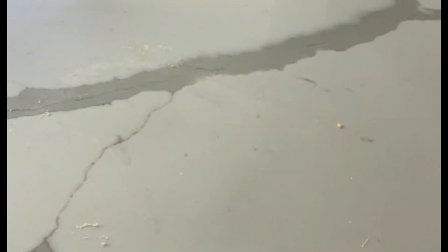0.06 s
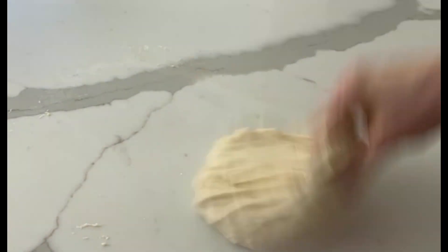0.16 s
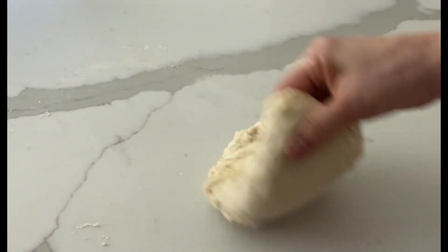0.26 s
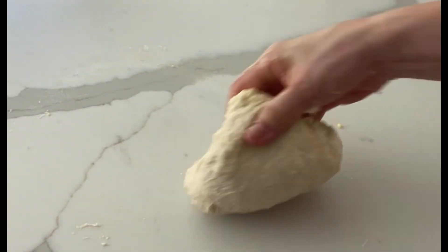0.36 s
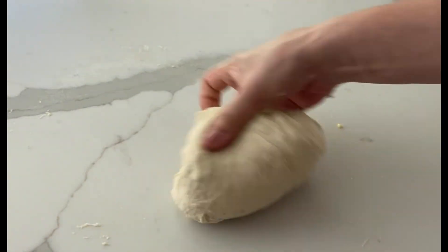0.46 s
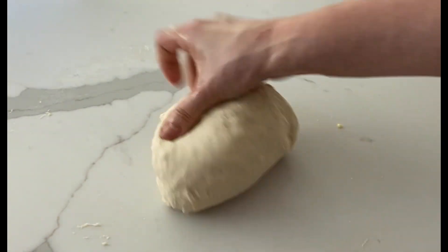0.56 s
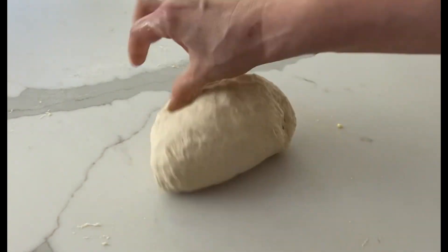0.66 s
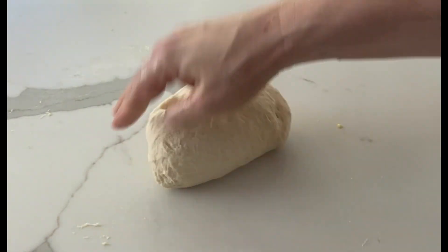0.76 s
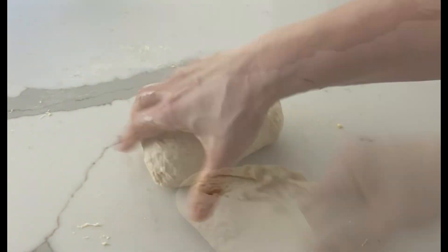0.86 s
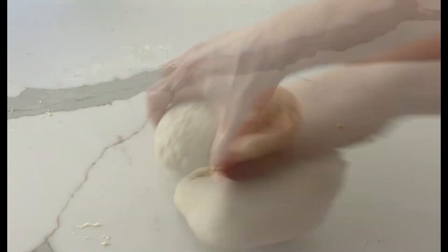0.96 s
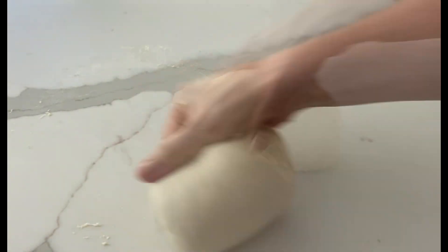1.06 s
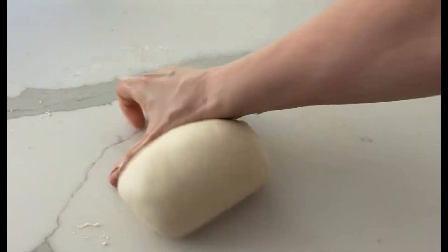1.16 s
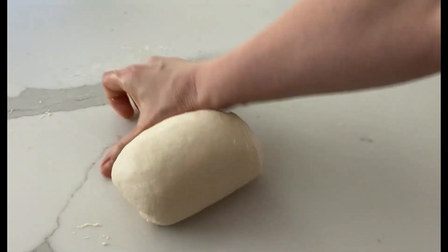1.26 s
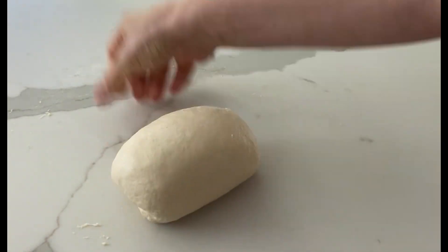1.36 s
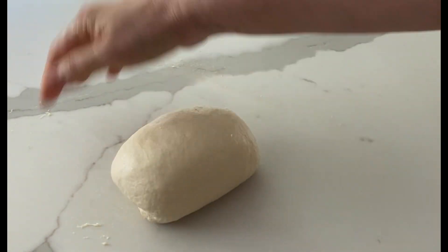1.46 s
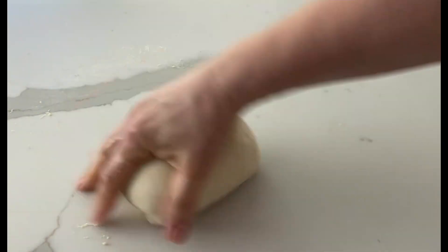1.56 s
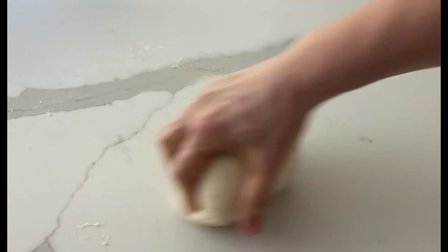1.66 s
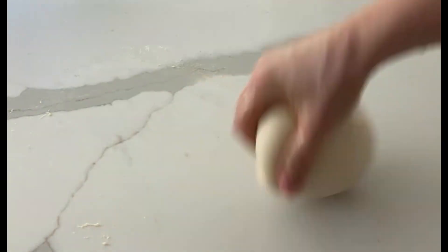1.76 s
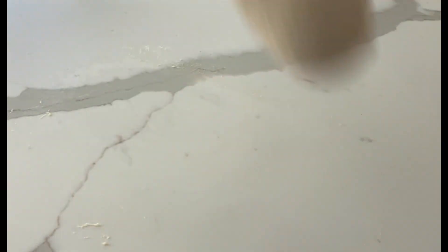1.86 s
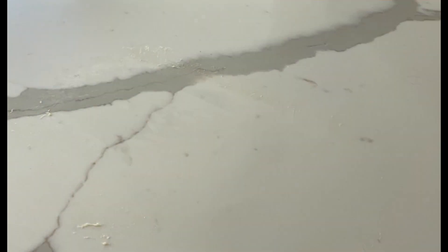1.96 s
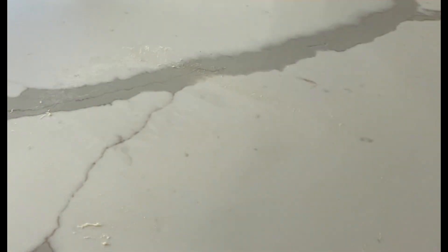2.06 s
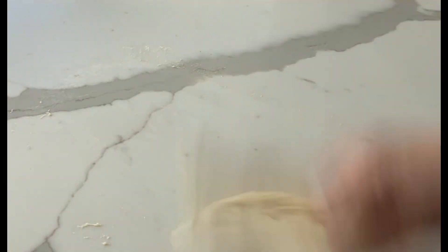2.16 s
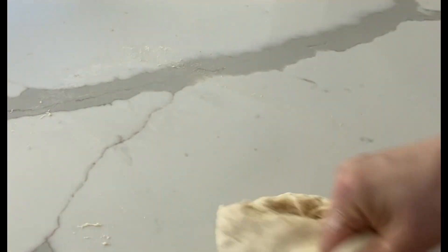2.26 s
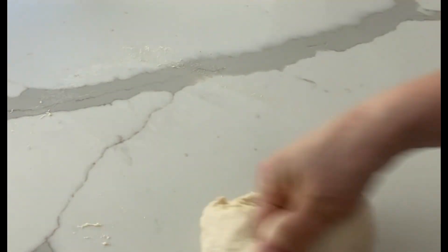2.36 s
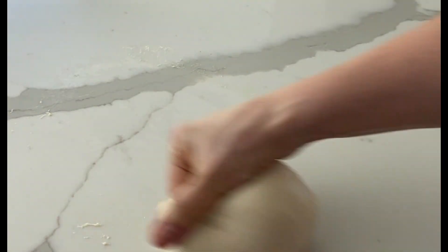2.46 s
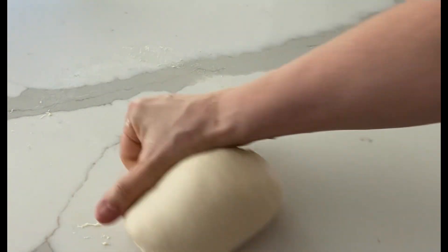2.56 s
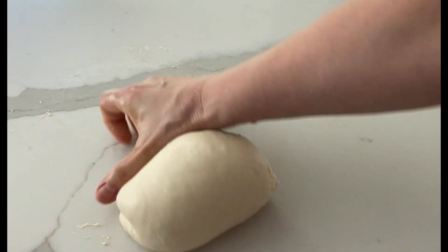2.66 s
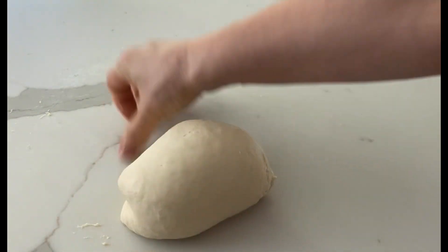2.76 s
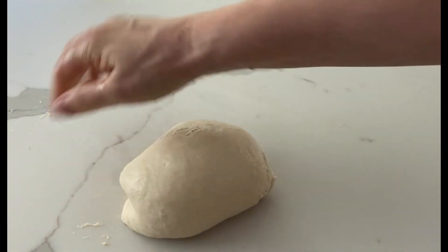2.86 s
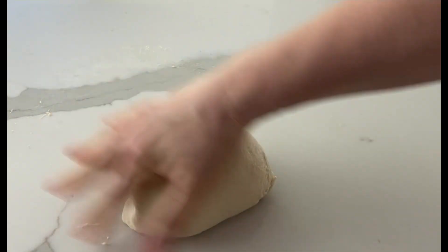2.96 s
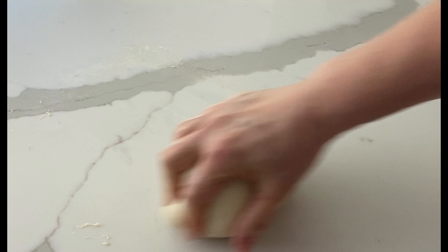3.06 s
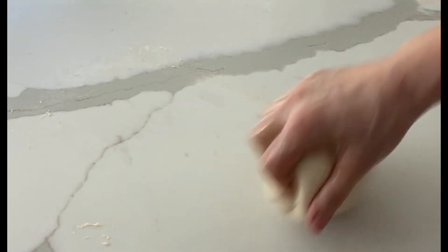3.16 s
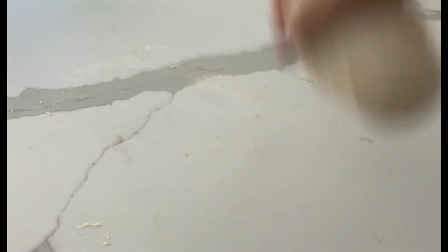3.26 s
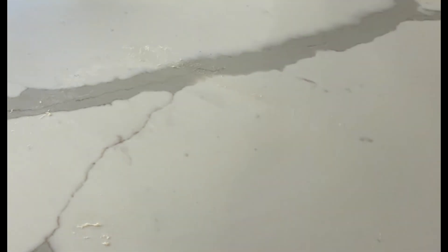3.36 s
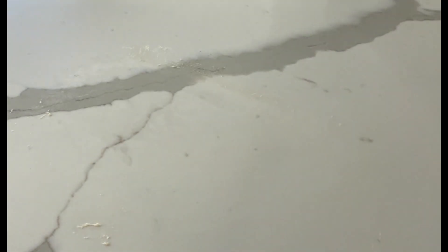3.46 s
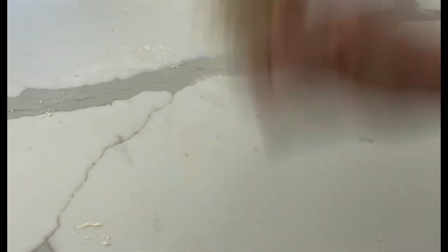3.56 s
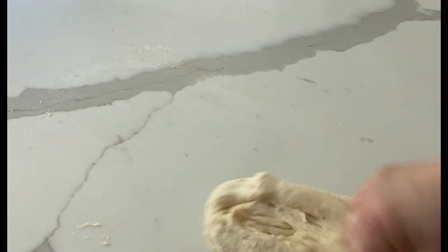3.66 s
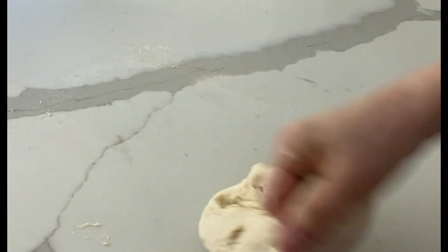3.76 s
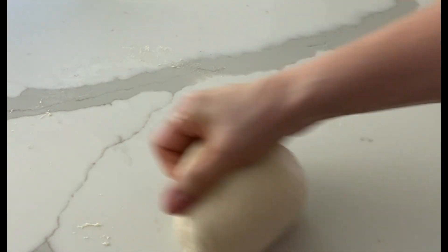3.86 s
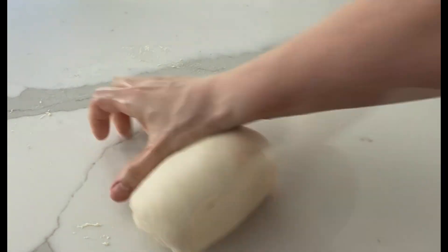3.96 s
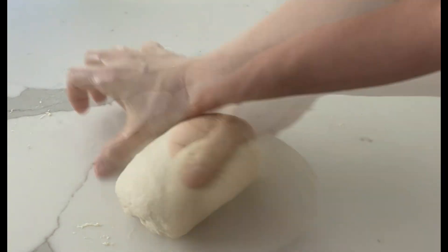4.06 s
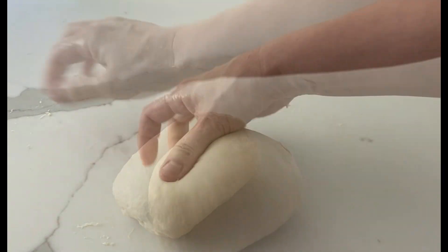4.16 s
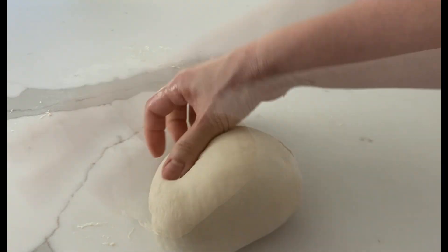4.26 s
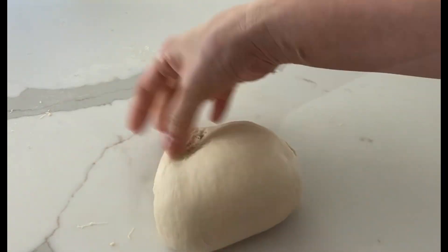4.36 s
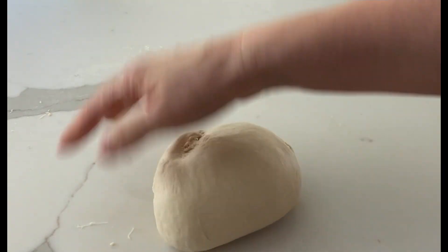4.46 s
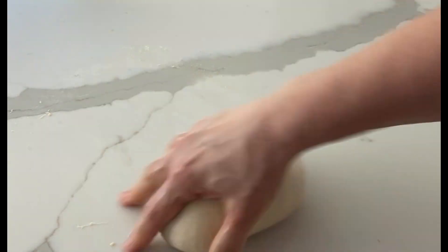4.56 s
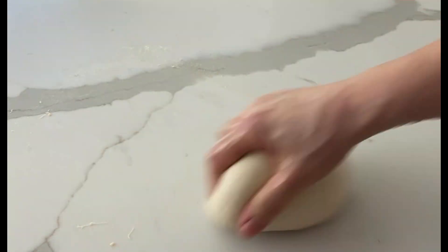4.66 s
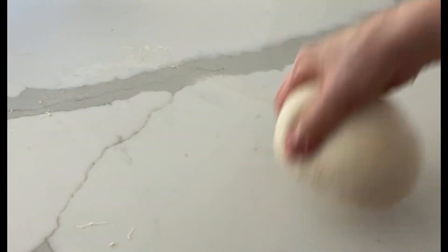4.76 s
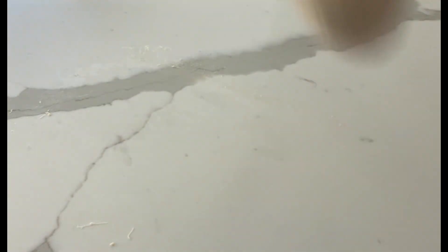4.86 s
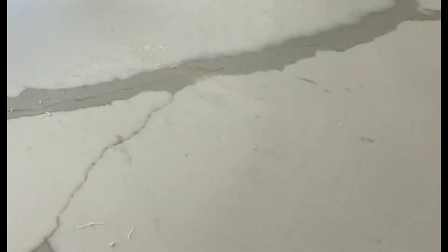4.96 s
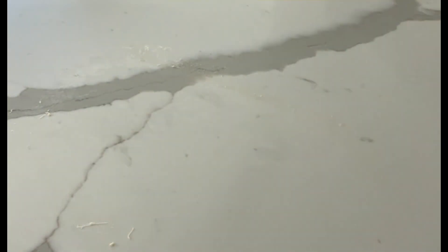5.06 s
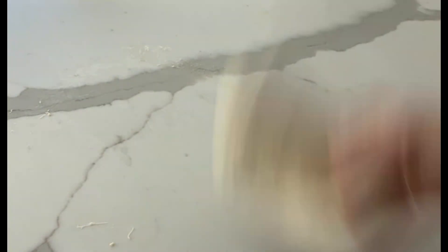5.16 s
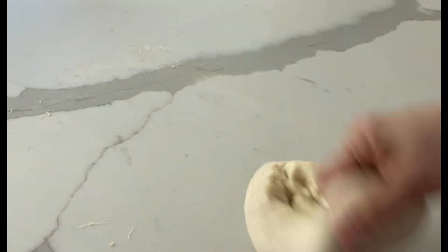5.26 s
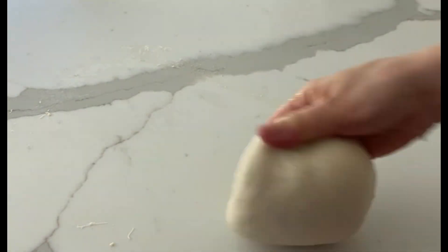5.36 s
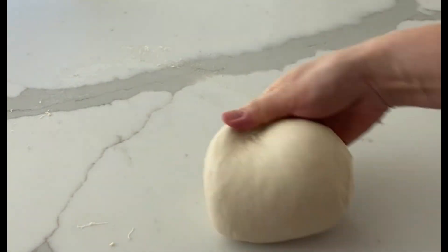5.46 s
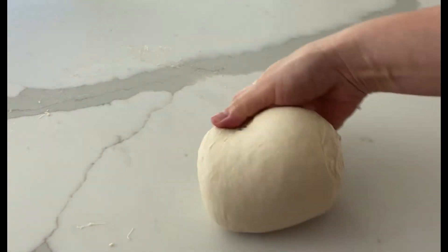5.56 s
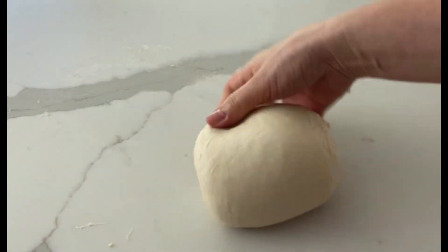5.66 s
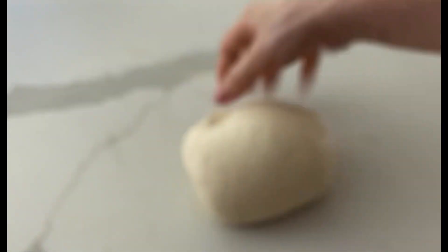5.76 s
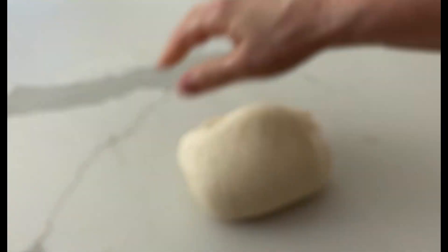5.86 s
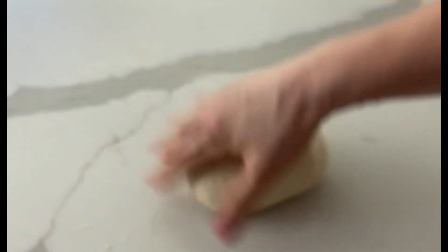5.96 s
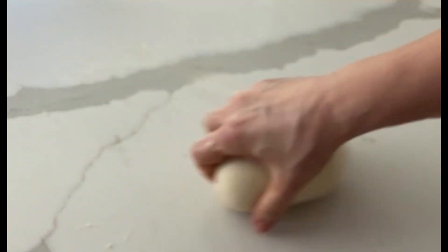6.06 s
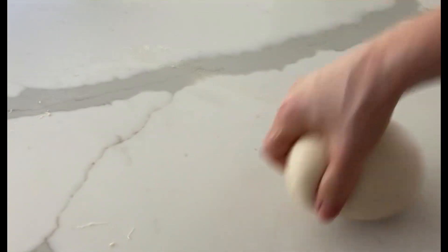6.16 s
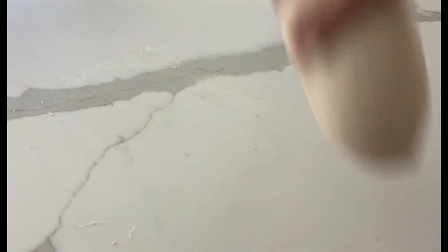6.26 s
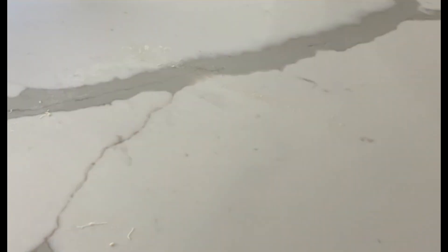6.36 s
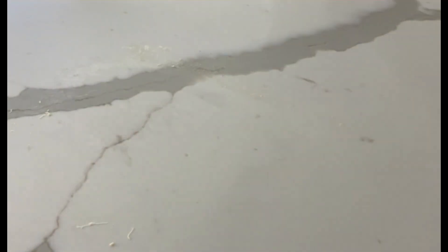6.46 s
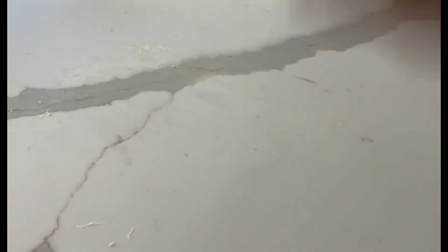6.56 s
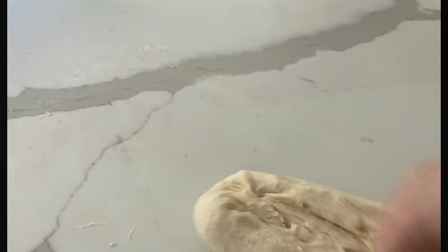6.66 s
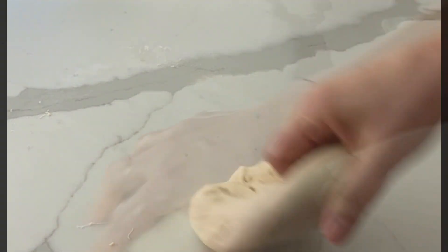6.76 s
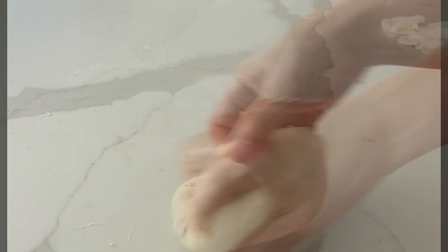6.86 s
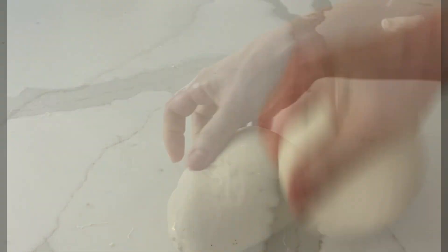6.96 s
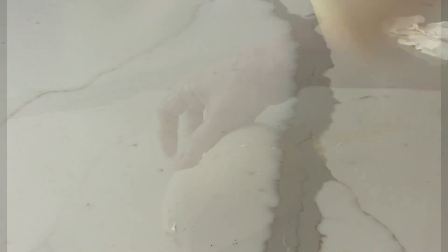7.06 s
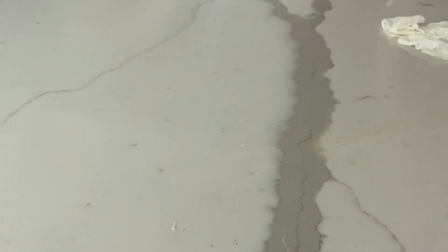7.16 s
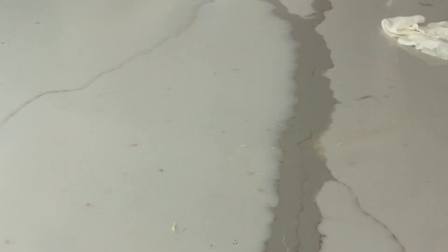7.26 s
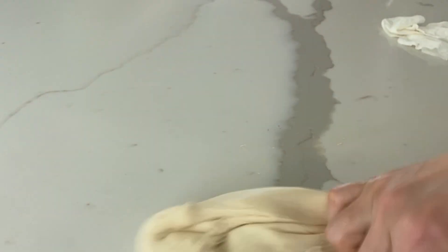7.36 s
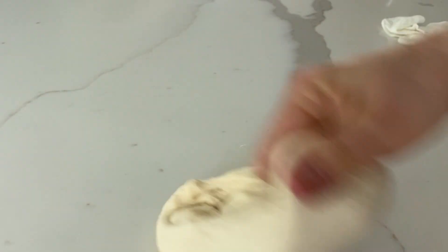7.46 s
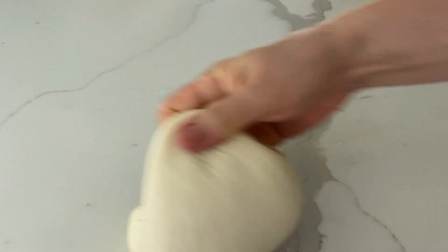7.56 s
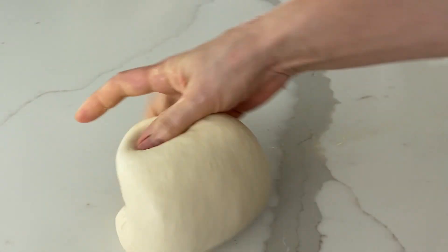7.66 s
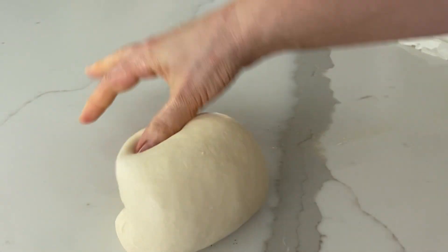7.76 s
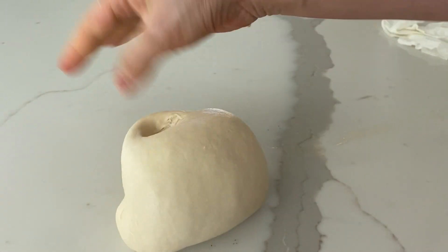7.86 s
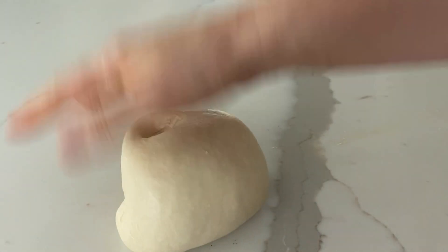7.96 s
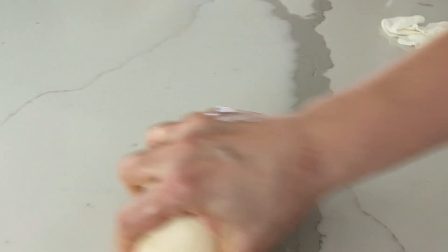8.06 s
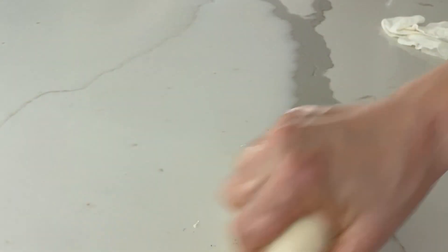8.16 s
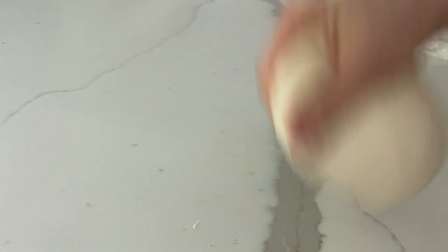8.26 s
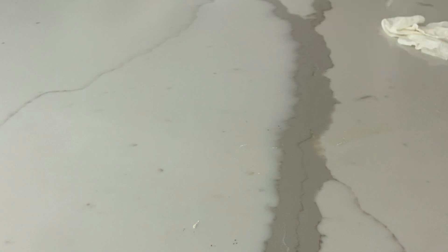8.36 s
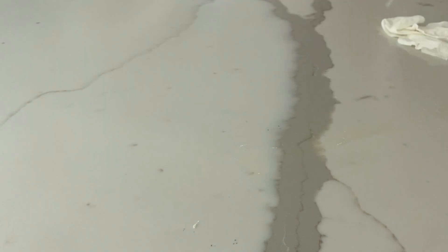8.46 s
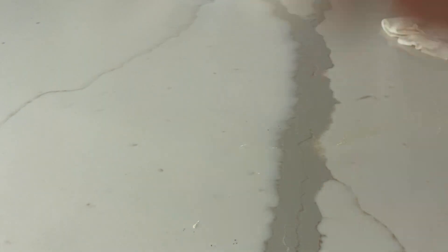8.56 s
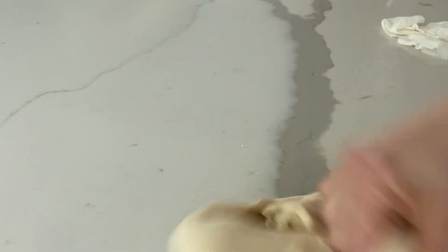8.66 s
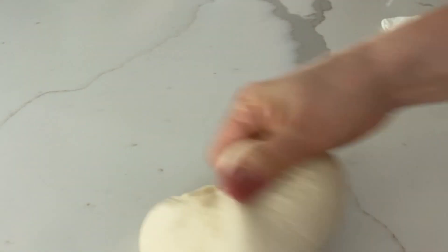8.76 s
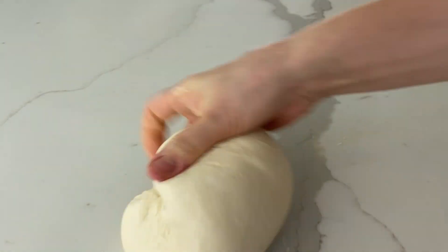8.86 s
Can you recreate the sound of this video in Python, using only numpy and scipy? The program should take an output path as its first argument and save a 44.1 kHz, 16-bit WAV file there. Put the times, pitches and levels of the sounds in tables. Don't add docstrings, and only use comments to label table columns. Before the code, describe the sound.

Loud, popping dough slaps ring around a hard kitchen, one rattling loose metal, between soft rolling, tapping and peeling over quiet appliance hum.

```python
import sys
import numpy as np
from scipy import signal
from scipy.fft import rfft, irfft
from scipy.io import wavfile
from scipy.ndimage import uniform_filter1d

SR = 44100
rng = np.random.default_rng(int(sys.argv[2]) if len(sys.argv) > 2 else 0)


def store_pcm(level_fs):
    pcm = np.round(np.clip(level_fs, -1, 1) * 32767).astype(np.int16)
    wavfile.write(sys.argv[1], SR, np.atleast_2d(pcm).T)


def amplitude_ratio(level_db):
    exponent = np.asarray(level_db, float) / 20
    return 10 ** exponent


N = 392490
t = np.arange(N) / SR
tail_t = t[:1 << 15]
TOP_HZ = 15850


def unit(x):
    return x / np.sqrt(np.mean(x ** 2))


def band(x, hz, width):
    return signal.lfilter(*signal.iirpeak(hz, hz / width, fs=SR), x)


def steep(x, lo_hz, hi_hz):
    sos = signal.butter(3, (lo_hz, hi_hz), "band", fs=SR, output="sos")
    return unit(signal.sosfilt(sos, x))


def on_log(hz, table, column=1):
    rows = np.array(table)
    return np.interp(np.log(np.maximum(hz, 1)), np.log(rows[:, 0]), rows[:, column])


def add(out, s, x):
    i = int(s * SR)
    out[i:i + len(x)] += x[:N - i]


def ring(modes, phases):
    total = 0
    for (hz, db, t60), phase in zip(modes, phases):
        total = total + amplitude_ratio(db - 60 * tail_t / t60) * np.sin(2 * np.pi * hz * tail_t + phase)
    return total


# frequency in Hz, density in dB per Hz.
HUM_SPECTRUM = [(18, -11.5), (26, 4), (55, 3.5), (150, -5.5), (340, -5), (450, -9), (700, -9.5),
                (1000, -14.5), (2400, -21.5), (3500, -23.5), (4300, -28), (9000, -31), (15300, -35),
                (16500, -36)]
# frequency in Hz, width in Hz, level in dB.
MOTOR_WHINES = [(344.15, 10, -81.5), (488, 7.4, -82.5), (2500, 12, -86.5), (3250, 30, -93.5)]


def hum():
    hz = np.fft.rfftfreq(N, 1 / SR)
    steady = rfft(rng.standard_normal(N)) * amplitude_ratio(on_log(hz, HUM_SPECTRUM)) * (hz > 16) * (hz < TOP_HZ)
    audible_rms = np.std(irfft(steady * (hz > 100), N))
    whine = 0
    for f, width, db in MOTOR_WHINES:
        wavering = 0.83 * unit(band(rng.standard_normal(N), f, width))
        whine = whine + amplitude_ratio(db) * (wavering + np.sin(2 * np.pi * f * t))
    return irfft(steady, N) * amplitude_ratio(-70) / audible_rms + whine


# length in seconds, stirred air in dB, air push in dB,
# rush of skin in dB, rush of dough in dB.
ARM_SWINGS = [(0.075, -47, -31.5, -66.5, -66), (0.018, -56.5, -42.5, -88.5, -90),
              (0.156, -46.5, -31.5, -58, -60.5), (0.097, -48, -33, -54, -57), (0.097, -47, -33, -47.5, -55),
              (0.211, -47.5, -32, -56, -53.5), (.55, -47.5, -26.5, -57, -55.5),
              (0.26, -47, -27.5, -55, -58.5)]


def draught():
    top_hz, hold_s, rise_db_per_s, fall_db_per_s, still_db = 9.9, 0.085, 39, 43, -61
    hz = np.fft.rfftfreq(N, 1 / SR)
    air = irfft(rfft(rng.standard_normal(N)) * np.exp(-(hz / top_hz) ** 2) * hz, N)
    stirred = []
    for (s, *_), (length, db, *_) in zip(BLOWS, ARM_SWINGS):
        before = rise_db_per_s * np.maximum(s - length - t, 0)
        after = fall_db_per_s * np.maximum(t - s - hold_s, 0)
        stirred.append(db - before - after)
    return amplitude_ratio(np.maximum(np.max(stirred, axis=0), still_db)) * unit(air)


THIRDS = 45 * 2 ** (np.arange(26)[:, None] / 3)
# frequency in Hz, width in Hz, boost in dB.
ROOM_COLOUR = [(593.22, 50, 1.5), (850, 36, 4.5), (953, 20, 5), (1281.5, 17, -0.5), (1577, 30, 6.5),
               (2024, 92, 5), (2333.4, 51, 3.5), (2750, 48, 5.5), (3300, 350, 5.5)]


def third_octaves():
    size = 2 * len(tail_t)
    hz = np.fft.rfftfreq(size, 1 / SR)
    share = np.clip(1 - abs(3 * np.log2(np.maximum(hz, 1) / THIRDS)), 0, 1)
    parts = rfft(rng.standard_normal(size)) * share * (hz < TOP_HZ)
    colour_db = sum(db / (1 + (2 * (hz - f) / w) ** 2) for f, w, db in ROOM_COLOUR)
    return irfft(parts * amplitude_ratio(colour_db)) / irfft(parts).std(axis=1, keepdims=True)


# frequency in Hz, level in dB, t60 in seconds.
ROOM_TAIL = [(60.1, -13, 0.64), (119.74, -15, 0.47), (253, -9, 0.49), (442.2, -8.5, 0.66),
             (700, -1, 0.6016), (986.96, -3, 0.63296), (1500, -7, 0.68609), (2200, -8.5, 0.63317),
             (3400, -10.5, .57), (4363.5, -16.5, 0.49), (6018.5, -14, 0.61), (8633, -18.5, .42),
             (12470, -28, 0.5), (16000, -29.5, .3)]


def room(parts, tilt_db, walls_db, share):
    start = rng.integers(len(tail_t))
    t60 = share * on_log(THIRDS, ROOM_TAIL, column=2)
    decay = np.exp(-3 * np.log(10) * tail_t / t60) + amplitude_ratio(walls_db) * np.exp(-tail_t / .025)
    level = amplitude_ratio(on_log(THIRDS, ROOM_TAIL) + tilt_db * np.log2(THIRDS / 1000))
    tail = (parts[:, start:start + len(tail_t)] * decay * level).sum(axis=0)
    return tail * (1 - .7 * np.exp(-(tail_t / 0.0076) ** 2)) * (1 - np.exp(-tail_t / 0.0013))


# frequency in Hz, width in Hz, dB over the room,
# t60 in seconds.
CROCKERY_TONES = [(845, 45, -2, .65), (955, 25, -11, .7), (1517, 16, -8, .7), (1980, 39, -15, 0.48),
                  (2780, 30, -12, 0.61), (3300, 50, -16, 0.67)]


def crockery():
    noise = rng.standard_normal((len(CROCKERY_TONES), len(tail_t)))
    tones = 0
    for (hz, width, db, t60), x in zip(CROCKERY_TONES, noise):
        wavering = unit(band(band(x, hz, width), hz, width))
        tones = tones + amplitude_ratio(db - 60 * tail_t / t60) * wavering
    return tones * (1 - np.exp(-tail_t / .03))


# start in seconds, length in seconds, skin in dB,
# roll in dB, sag by the end in dB.
HAND_STROKES = [(.5, .17, -65.5, -80, 3), (1.557, .09, -65.5, -69, 4.5), (1.68, 0.064, -66, -64, 1.5),
                (2.009, .06, -70, -74, 13), (2.63, 0.15, -62.5, -51.5, 19.5), (2.985, 0.091, -65, -67, 8),
                (3.078, 0.14, -68.5, -65.5, 11), (3.345, .1, -74.5, -77.5, 11), (3.43, 0.042, -82, -88, 4),
                (3.983, 0.27, -71.5, -51.5, 13), (4.3, .09, -73, -67, 5.5), (4.55, 0.086, -72, -69.5, 3.5),
                (4.65, 0.093, -71.5, -68, -2.5), (5.7, .15, -75.5, -66.5, 16.5),
                (5.982, 0.23, -65, -62, 10), (7.12, 0.13, -68.5, -90, 10), (7.526, 0.068, -67, -40.5, 2.5),
                (7.631, 0.31, -67.5, -42, 24.5), (8.007, 0.063, -71.5, -65, 6),
                (8.053, 0.04, -67.5, -65.5, -1), (8.11, 0.13, -67, -66, 16),
                (8.253, 0.038, -72.5, -80.5, 6), (8.393, 0.16, -66, -87, 17),
                (8.715, 0.24, -60, -40.5, 4.5)]


def rub():
    attack_s, release_s, rush_db_per_s = 0.024, 0.037, 418.5
    treble_db, treble_slope = -4.5, 0.42
    step = 32
    clock = np.arange(N // step + 1) * step / SR
    touch = []  # presence, skin dB, roll over skin dB
    for s, length, skin_db, roll_db, sag_db in HAND_STROKES:
        corners = (s - attack_s, s, s + length, s + length + release_s)
        edge = np.interp(clock, corners, (0, 1, 1, 0))
        sag = sag_db * np.clip((clock - s) / length, 0, 1)
        touch.append((edge, skin_db - sag, roll_db - skin_db))
    for (s, *_), (*_, skin_db, roll_db) in zip(BLOWS, ARM_SWINGS):
        touch.append((clock < s, skin_db - rush_db_per_s * abs(s - clock), roll_db - skin_db))

    def smooth(gain):
        return uniform_filter1d(gain.repeat(step)[:N], size=step)

    skin_gain = smooth(sum(edge * amplitude_ratio(db) for edge, db, _ in touch))
    treble_gain = smooth(sum(edge * amplitude_ratio(db + treble_db - treble_slope * np.clip(db + 64, -15, 20))
                             for edge, db, _ in touch))
    roll_gain = smooth(sum(edge * amplitude_ratio(db + over_db) for edge, db, over_db in touch))
    grain_db = 1.5 * rng.exponential(size=N // 64 + 1).repeat(64)[:N]
    grains = rng.standard_normal(N) * amplitude_ratio(grain_db)
    skin = steep(grains, 1500, 3800)
    treble = steep(band(grains, 5800, 3500), 4600, 15500)
    roll = steep(grains, 550, 1400) + amplitude_ratio(-14) * steep(grains, 1850, 2100)
    roll = roll + amplitude_ratio(-13.5) * steep(grains, 1400, 3700)
    return amplitude_ratio(-3.5) * (skin_gain * skin + treble_gain * treble) + amplitude_ratio(-4.0) * roll_gain * roll


# time in seconds, length in seconds, level in dB,
# start frequency in Hz, end frequency in Hz.
DOUGH_PEELS = [(0.131, .012, -63, 3600, 3400), (3.353, 0.0096, -66, 2200, 2446),
               (3.381, .012, -67, 2620, 2852), (6.437, 0.01046, -72, 3520, 3430),
               (7.126, 0.013, -62.5, 3400, 3164), (7.151, 0.0124, -65, 3180, 2723),
               (8.41, 0.02336, -60, 2970, 3300), (8.441, .02, -65, 2900, 2600),
               (2.023, .015, -66, 2600, 3120)]


def peels():
    out, u = np.zeros(N), tail_t[:4096]
    noises = rng.standard_normal((len(DOUGH_PEELS), 4096))
    for (s, length, db, start_hz, end_hz), noise in zip(DOUGH_PEELS, noises):
        x = (u - u[2048]) / length
        phase = 2 * np.pi * np.cumsum(np.interp(x, (-1, 1), (start_hz, end_hz))) / SR
        rough = unit(uniform_filter1d(uniform_filter1d(noise, 40), 40))
        squeak = np.sin(phase) + amplitude_ratio(-12) * np.sin(1.6 * phase)
        add(out, s - u[2048], amplitude_ratio(db) * np.exp(-x ** 2) * (0.69 + .6 * rough) * squeak)
    return out


# time in seconds, peak in dB, pitch in Hz, spread in ms, thud in dB.
FINGER_TAPS = [(1.549, -35.5, 2200, 3.38, -5), (2.006, -52, 2500, 3.7, -13.5),
               (2.075, -53, 1500, 1.8, -6.5), (2.592, -38, 1107, 0.77, -4.5), (2.609, -32, 1198, 1.03, -9),
               (2.971, -33.5, 2650, 2, -8.5), (3.572, -37, 1997, 0.69, -2), (3.96, -33.5, 880, 0.75, 4.5),
               (4.301, -47.5, 5600, 1.16, -5), (4.544, -39.5, 2840, 1.9, -2), (4.645, -54, 5500, 2.5, 0.5),
               (5.981, -40.5, 2500, 3.3, -1), (6.007, -49, 3003, 0.96, -8.5), (7.99, -44.5, 2704, 1.44, -7),
               (8.0, -34, 2500, 1.5, -10), (8.04, -39, 5147, 1.5, 9.5), (8.241, -48.5, 3300, 1.5, -7),
               (8.247, -40.5, 3300, 0.98, 1.5), (8.597, -33, 2500, 1.5, -7),
               (8.6085, -10.5, 2820, 0.56, -9)]
# time in seconds, peak in dB, pitch in Hz.
THREAD_SNAPS = [(1.985, -62, 11000), (4.342, -59, 5400), (4.378, -59.5, 5500), (4.465, -63, 6010),
                (5.75, -59, 5500), (6.064, -52, 9000), (7.535, -47, 11500), (7.653, -50, 10500),
                (7.698, -58, 9000), (7.819, -59, 9000), (8.52, -60, 3210), (8.543, -58.5, 5000),
                (8.562, -54.5, 5900), (8.835, -45, 6500), (7.205, -61, 5600), (8.89, -55, 7000)]
# time in seconds, level in dB, frequency in Hz.
LOW_BUMPS = [(1.164, -50.5, 306.8), (3.969, -47.5, 311), (5.75, -55.5, 100.3), (5.981, -50, 85.5),
             (7.74, -48, 137), (8.03, -54, 137.7), (7.344, -26, 110), (8.618, -19.5, 116),
             (8.64, -24, 250)]


def taps():
    out, u = np.zeros(N), tail_t[:2048]
    rows = [*FINGER_TAPS, *((s, db, hz, .85, -14) for s, db, hz in THREAD_SNAPS)]
    for (s, db, hz, spread_ms, thud_db), noise in zip(rows, rng.standard_normal((len(rows), 2048))):
        clicks = noise ** 3 * np.exp(-((u - u[512]) * 1000 / spread_ms) ** 2)
        palm = steep(clicks, hz * .8, hz * 1.2)
        thud = amplitude_ratio(thud_db - 1) * steep(clicks, 350, 850)
        bright = amplitude_ratio(-5 + 3 * np.log2(hz / 2500)) * steep(band(clicks, 3300, 4500), 900, 13000)
        tap = palm + thud + bright
        add(out, s - u[512], amplitude_ratio(db) * tap / abs(tap).max())
    for s, db, hz in LOW_BUMPS:
        swell = tail_t / 0.016 * np.exp(1 - tail_t / 0.0066)
        add(out, s, amplitude_ratio(db) * np.sin(2 * np.pi * hz * tail_t) * swell)
    return out


TRINKET_MODE_HZ = [2978, 3034, 3218, 3914, 4769, 5937, 5982, 6082, 6783, 7887, 9146, 9362, 12750]
# level in dB, t60 in seconds, level returned by the room in dB.
TRINKET_MODES = [(3.5, 0.12, -25.5), (-12, .1, -36.5), (-19.5, 0.086, -41.5), (-20, .1, -44.5),
                 (-11.5, 0.17, -29.5), (-12, .11, -34.5), (-12, 0.31, -35), (-15.5, 0.066, -38),
                 (-24, 0.077, -44), (-26, .15, -46), (-24, 0.13, -41.5), (-28, .15, -46), (-29, .11, -49)]
# time in seconds, level in dB.
TRINKET_BOUNCES = [(.177, -10.5), (0.184, -16), (.198, -11.5), (.204, -12), (.22, -23.5), (0.239, -27.5)]


def trinket():
    out, (db, t60, back_db) = np.zeros(N), np.transpose(TRINKET_MODES)
    for s, bounce_db in TRINKET_BOUNCES:
        clink = ring(zip(TRINKET_MODE_HZ, db, t60), 2 * np.pi * rng.random(len(db)))
        add(out, s, amplitude_ratio(bounce_db) * clink * (1 - np.exp(-tail_t / .001)))
    noises = rng.standard_normal((len(db), len(tail_t)))
    for hz, level_db, noise in zip(TRINKET_MODE_HZ, back_db, noises):
        fade = amplitude_ratio(level_db - 60 * tail_t / on_log(hz, ROOM_TAIL, column=2))
        wavering = unit(band(band(noise, hz, 40), hz, 45))
        add(out, TRINKET_BOUNCES[0][0], fade * (1 - np.exp(-tail_t / 0.018)) * wavering)
    return out


def air_pocket(pocket_hz, cycles, tilt_db):
    front = 1 - np.exp(-tail_t / .00005)
    squeeze = np.exp(-tail_t / .002 - (tail_t * pocket_hz / cycles) ** 4)
    pop = front * squeeze * np.cos(2 * np.pi * pocket_hz * tail_t - .5)
    spray = rng.standard_normal(len(tail_t))
    crack = .4 * (steep(spray, 1300, 5200) + .6 * steep(spray, 1450, 2200))
    crack = crack * tail_t / 0.0008 * np.exp(-(tail_t / 0.0012) ** 2)
    return pop + amplitude_ratio(-7 + 4.7 * tilt_db) * crack


SLAB_MODE_HZ = [48.4, 92, 240, 860, 1523]
# level in dB, t60 in seconds.
SLAB_MODES = [(-18, .6), (-29.5, 0.4), (-34.5, 0.76), (-33, 0.23), (-39.5, 0.69)]


def slab_hum():
    phase = np.r_[-2.6, -2.0, 2 * np.pi * rng.random(len(SLAB_MODES) - 2)]
    modes = zip(SLAB_MODE_HZ, *np.transpose(SLAB_MODES))
    return ring(modes, phase) * (1 - np.exp(-tail_t / .008))


def arm_push(since):
    u = (since + .045) / np.where(since < -.045, .032, .027)
    held = np.exp(-np.maximum(since, 0) / .012)
    return np.where(u < 0, -u * np.exp(.5 - u ** 2 / 2), -1.5 * np.tanh(u) * held)


# time in seconds, blow in dB, air pocket in Hz, room in dB,
# brightness in dB per octave.
BLOWS = [
    (0.1681, 4, 800, -19.5, 2),
    (0.7829, 10.5, 700, -16.5, 0.5),
    (2.1627, 8, 890, -17, 1),
    (3.5985, 3.5, 737.4, -20.5, 1.22),
    (5.1874, 7.5, 850, -18.5, 0.85),
    (6.637, 10.5, 850, -18, 0.09),
    (7.3375, 6, 674, -27, -0.5),
    (8.6121, 4, 706.8, -28.5, 0.15),
]


def slap(out, parts, shot, s, blow_db, pocket_hz, room_db, tilt_db, push_db):
    out, (_, slab_db, walls_db, share, cycles) = out.copy(), shot
    pocket = air_pocket(pocket_hz, cycles, tilt_db)
    suck = -tail_t / .005 * np.exp(-(tail_t / .007) ** 2)
    add(out, s, amplitude_ratio(blow_db) * pocket + amplitude_ratio(-13.0) * suck + amplitude_ratio(slab_db - 4.5) * slab_hum())
    add(out, s, amplitude_ratio(room_db - 8.5) * (room(parts, tilt_db, walls_db, share) + crockery()))
    early = min(s, .2)
    add(out, s - early, amplitude_ratio(push_db) * arm_push(tail_t - early))
    return out


# hum in dB, slab in dB, nearby walls in dB over the room,
# share of the room's ring time, cycles of the air pocket.
SHOT_SETTINGS = [(4, -3, -3, 0.94, 1), (2.5, 0, -7, 1, 1.3), (2, 1, -9, 0.96, 1.2),
                 (-2.5, -8.5, 4.5, 1, 2.1)]
BLOW_SHOT = [0, 1, 1, 1, 2, 2, 3, 3]
# start in seconds, end in seconds.
SHOT_FADES = [(-.05, 0.095), (.73, 1.28), (4.0, 4.5), (6.75, 7.123)]


def scene():
    parts = third_octaves()
    echo = 30 * unit(room(parts, 2.5, -6, .98)) / np.sqrt(len(tail_t))
    ground = hum()
    shots = [amplitude_ratio(shot[0]) * np.roll(ground, k * SR * 2) for k, shot in enumerate(SHOT_SETTINGS)]
    shots[0] = shots[0] + trinket()
    for k, blow, swing in zip(BLOW_SHOT, BLOWS, ARM_SWINGS):
        shots[k] = slap(shots[k], parts, SHOT_SETTINGS[k], *blow, swing[2])
    up = [np.interp(t, fade, (0, 1)) for fade in SHOT_FADES] + [0]
    mix = 0
    for k, shot in enumerate(shots):
        overloaded = shot / (1 + shot ** 6) ** (1 / 6)
        mix = mix + (up[k] - up[k + 1]) * overloaded
    hands = taps()
    hands_in_room = amplitude_ratio(-48) * signal.fftconvolve(hands, echo)[:N]
    return (mix + draught() + hands + rub() + peels() + hands_in_room)[None]


def top_cut(x):
    return signal.sosfilt(signal.butter(12, 16880, fs=SR, output="sos"), x)


def record(dry):
    mix = signal.sosfilt(signal.cheby2(6, 40, 17500, fs=SR, output="sos"), dry)
    return top_cut(mix)


dry = scene()
out = record(dry)
store_pcm(out)
```